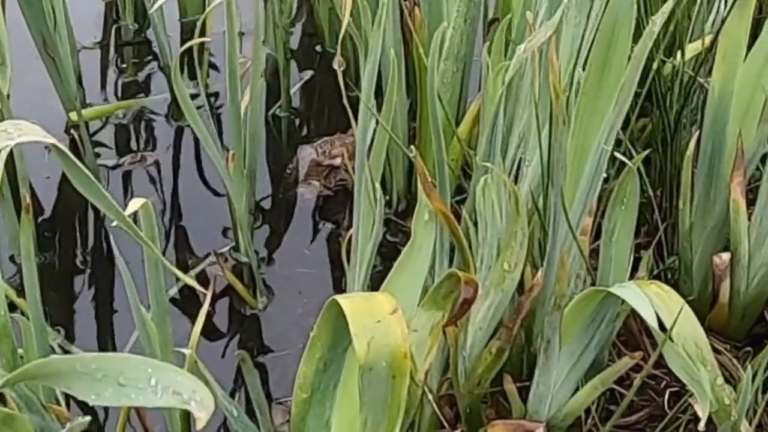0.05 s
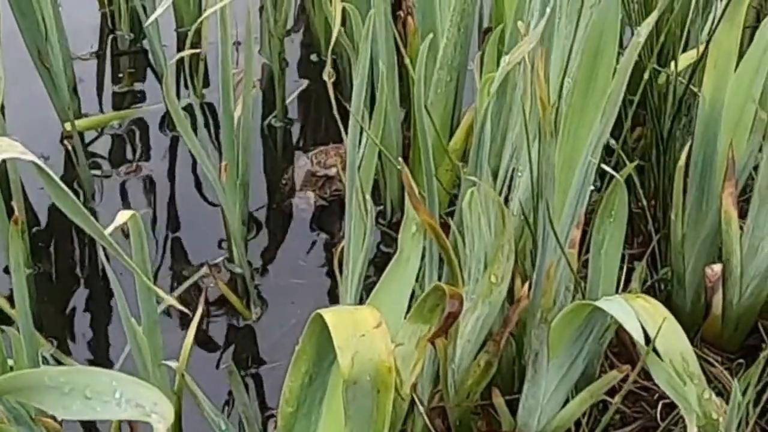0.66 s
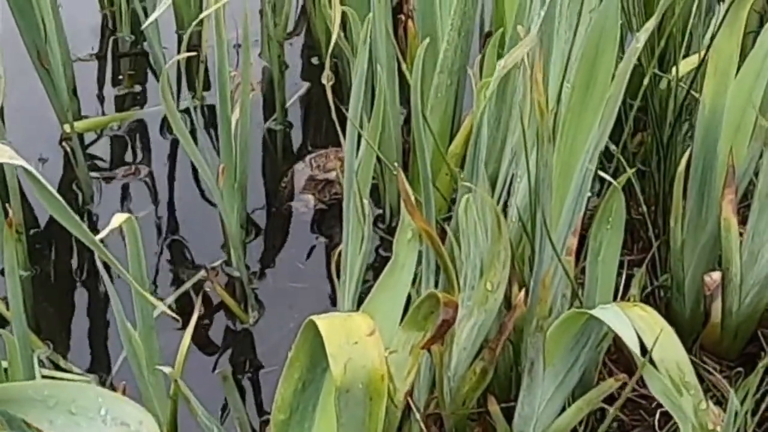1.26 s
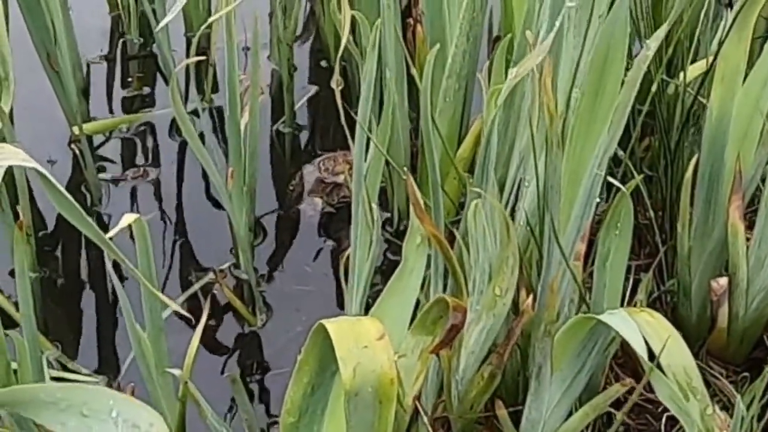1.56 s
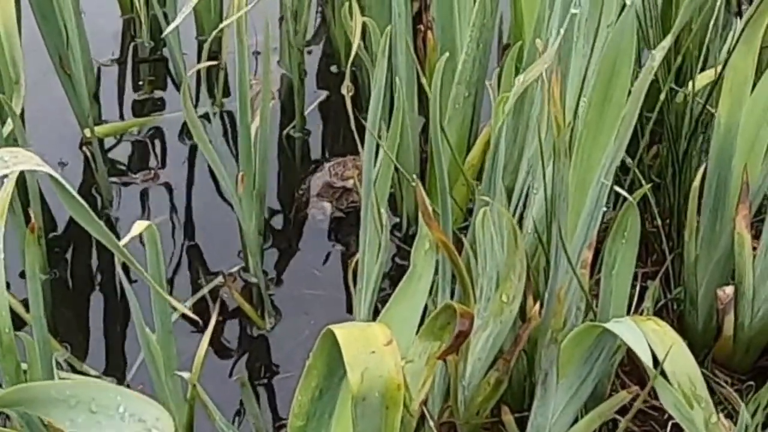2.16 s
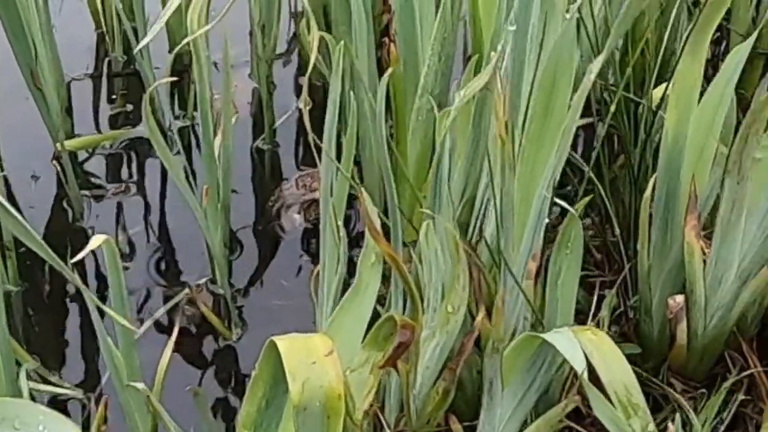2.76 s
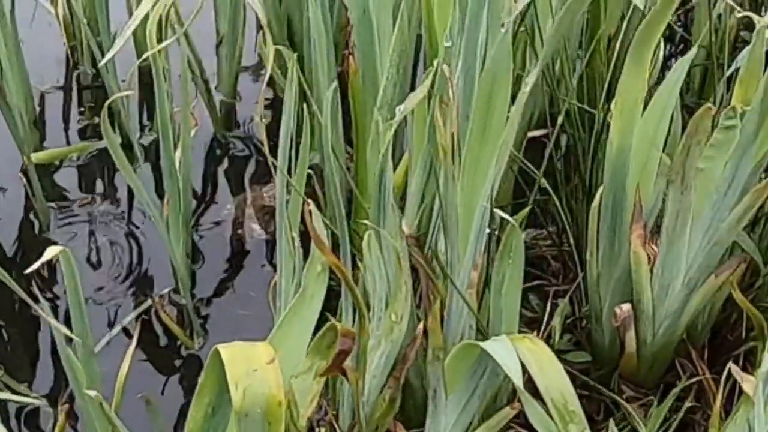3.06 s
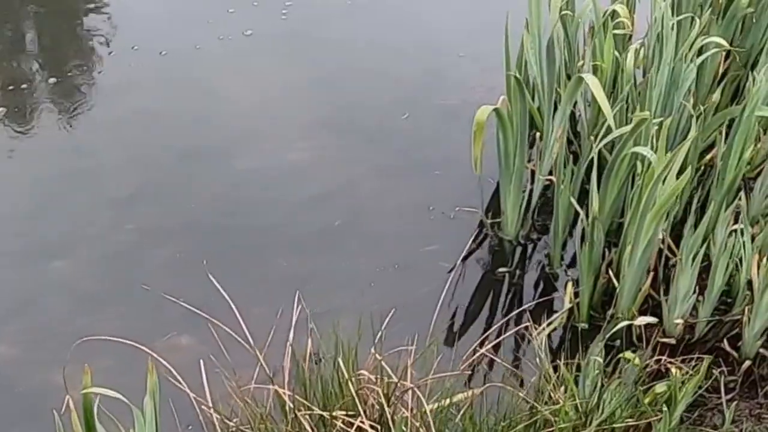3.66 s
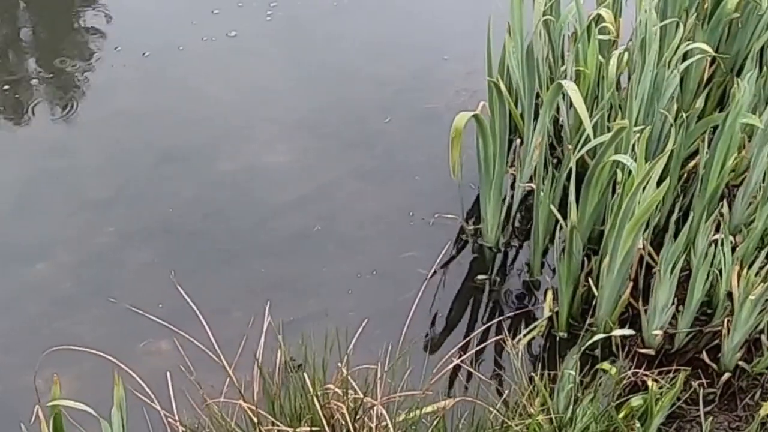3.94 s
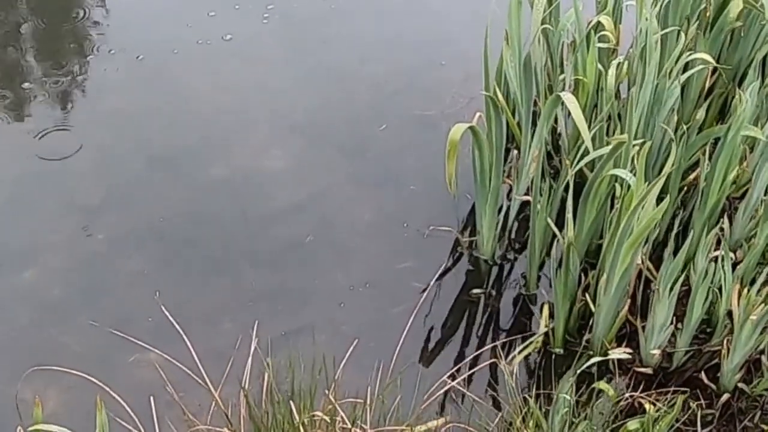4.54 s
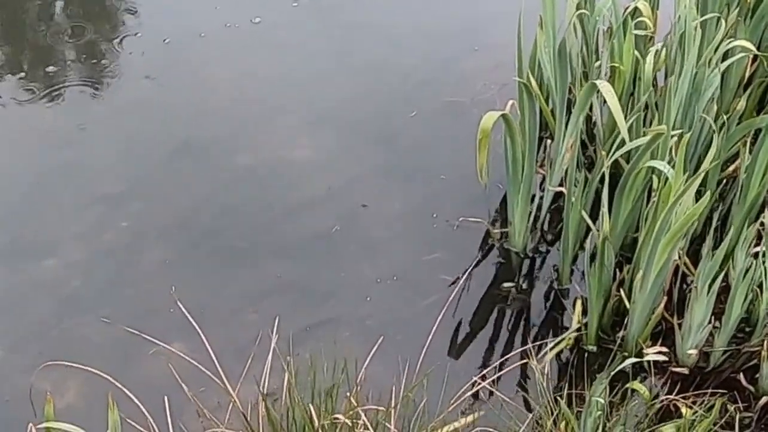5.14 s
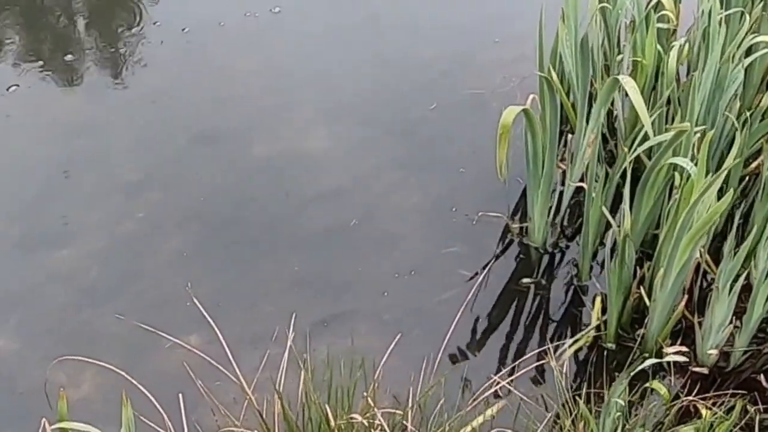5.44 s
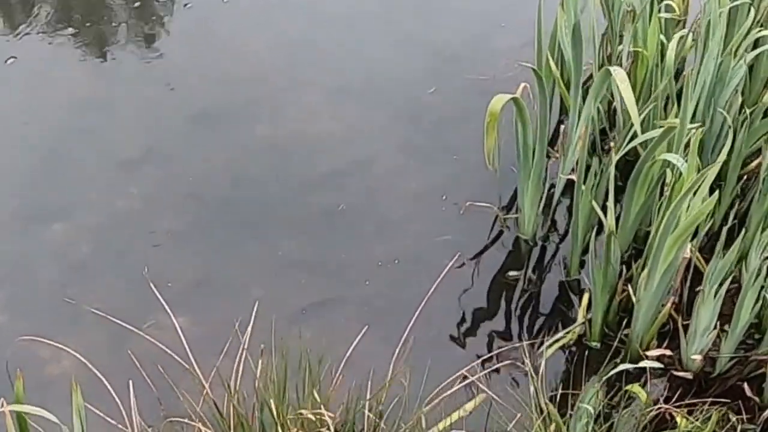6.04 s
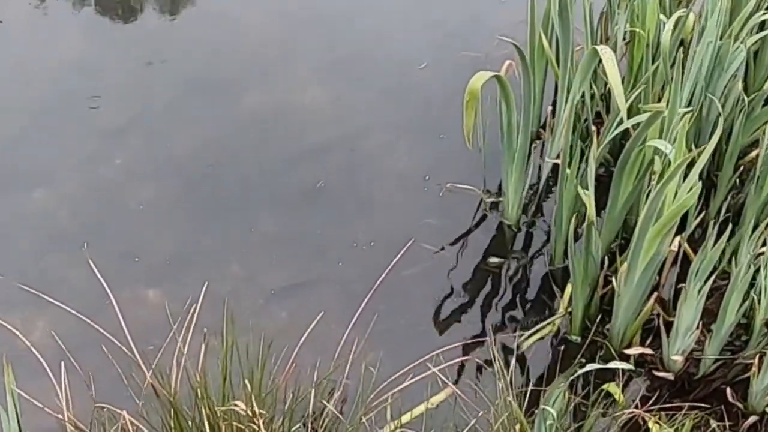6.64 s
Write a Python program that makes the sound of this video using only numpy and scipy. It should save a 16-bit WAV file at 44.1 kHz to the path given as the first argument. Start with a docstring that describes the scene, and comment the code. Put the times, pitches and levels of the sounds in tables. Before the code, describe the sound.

Small birds sing, chirp and twitter around a pond over low wind rumble, with a few raindrops tapping leaves and one sharp click.

```python
"""Small birds whistle around a pond in light drizzle, echoed by the trees, over a soft hush and wind
rumble on the microphone. A lilting song opens; paired chirps and two-voiced mews follow while drops
knock on leaves. At 3.2 s a drop plips into the water, its trapped bubble ringing upward. At 3.5 s
a sharp click sounds and the background falls slightly. From 4.2 s another singer twitters, trills
and ends in a flourish; low, rasping clucks from across the water close the scene."""
import sys
import numpy as np
from scipy import signal
from scipy.fft import rfft, irfft, next_fast_len
from scipy.io import wavfile
from scipy.ndimage import uniform_filter1d, map_coordinates

SR = 44100
rng = np.random.default_rng(int(sys.argv[2]) if len(sys.argv) > 2 else 0)


def int16_out(signal):
    """Quantize to a 16-bit WAV file."""
    q = np.round(np.clip(np.atleast_2d(signal).T, -1, 1) * 32767)
    wavfile.write(sys.argv[1], SR, q.astype(np.int16))


N = 299880

# noise spectra: freq_hz, relative_density_db
RUMBLE_SPECTRUM = [(30, -54), (50, -1), (90, -0.5), (125, -6), (170, -7), (260, -17.5), (600, -44)]
HUSH_SPECTRUM = [(80, -21), (180, -0.5), (270, 1), (400, -1), (600, -3), (850, -5), (1100, -8.5),
                 (1800, -17), (4000, -27.5)]
HISS_SPECTRUM = [(600, -15), (1400, 4), (2000, 2), (3000, 2.5), (4500, 0.5), (7000, -2.5), (10000, -6),
                 (16000, -9)]
WIND_SPECTRUM = [(1, -11.5), (4, 0.5), (10, -2), (19, -8), (30, -16.5), (36, -17.5), (46, -40), (70, -62),
                 (150, -120)]
SPLASH_SPECTRUM = [(300, -9), (1500, -1), (3100, 1.5), (5000, -8), (7800, -17), (9000, -3.5), (10500, -18),
                   (16000, -22)]
RASP_SPECTRUM = [(700, -25), (1200, 1), (1500, -3), (1850, -10.5), (2300, 2), (2900, -13), (4500, -10),
                 (8000, -40)]
# rumble swells: centre_s, half_width_s, rise_db
RUMBLE_SWELLS = [(.25, .1, 5), (2.4, .35, 3.5), (3.17, .22, 7.5), (5.7, .3, 3)]
# far drones: start_s, end_s, pitch_hz, level_db
FAR_DRONES = [(0, 3.5, 162, -56), (0, 3.5, 568, -58), (.9, 2.3, 830, -59.5), (3.6, 4.6, 138, -52.5),
              (4, 4.9, 650, -59), (6.3, 6.9, 650, -61), (6.2, 6.9, 338, -59)]
# wind strength: time_s, relative_db
GUSTS = [(0, -30), (.9, -33), (2.1, -31), (2.4, -27), (3.5, -27), (5.6, -28.5), (6.4, -26), (6.7, -30)]
# tree echo: freq_hz, t60_s
TREE_DECAY = [(500, 0.73), (2500, 2.45), (4300, 1.31), (6000, 0.94), (8000, 0.69)]
# drops on leaves: start_s, level_db, pitch_hz
LEAF_PATS = [(.343, -26, 413), (.420, -28.5, 260), (1.126, -28.5, 288), (1.885, -26, 329.9),
             (2.183, -31.5, 373), (2.622, -23.5, 345), (2.897, -29.5, 405), (2.989, -24, 476),
             (3.168, -24.5, 524), (3.196, -21, 533), (4.997, -27, 280), (5.746, -24, 520)]
# splashes and leaf ticks: start_s, level_db, length_s
SPLASH_BURSTS = [(3.140, -39.5, 0.039), (3.196, -44, .003), (3.645, -45, 0.039), (4.313, -46, .003)]
# syllable contours by shape: time_ms, pitch_hz, level_db
SYLLABLES = { "slide": [(0, 5150, -12), (20.35, 4900, -5.5), (38.05, 4580, 0.5), (51.8, 4320, -1.5),
             (62, 4100, -9.5), (88.8, 3400, -12)], "double": [(0, 4050, 0.5), (10, 4350, -1.5),
             (23, 5050, 1), (32, 6350, -3), (39, 5900, -16), (44, 4300, -6), (54, 4400, 0),
             (72.1, 5300, -1.5), (83, 6250, -6)], "arch": [(0, 4100, -6), (21, 4550, 0), (35, 5600, -.5),
             (45, 6750, -8), (53, 7200, -13), (66, 6400, -6), (80, 5550, 2), (92, 5600, -15)],
             "chip": [(0, 2950, -2.5), (4, 3100, -3), (8, 3700, -6), (13, 4350, 3), (21.05, 4700, -7.5),
             (26.93, 4900, -6.5), (32.33, 5700, -2), (36.8, 4250, -0.5), (40.9, 3750, -5.5),
             (48, 3340, -25)], "lisp": [(0, 5100, -4), (11, 5450, 1), (21, 6200, 1.5), (32, 8300, -4)],
             "mew": [(0, 2600, -19), (24.93, 3200, -0.5), (41.6, 3380, 1.5), (61.1, 3300, 0.5),
             (82.2, 2900, -3), (101, 2400, -2), (119.6, 2230, -7.5), (137, 2470, -12)],
             "seep": [(0, 7400, -8), (14.9, 7650, -5), (39.3, 7850, -8.5), (65, 8600, -14)],
             "tick": [(0, 7400, -18), (12.7, 6100, -4), (19, 7000, -1), (27.5, 8150, 1.5),
             (33.7, 8100, -4)], "down": [(0, 6200, 0), (5, 5800, -5.5), (9.05, 4400, 2.5),
             (14.9, 3800, -11), (22.9, 3150, -7)], "peep": [(0, 5000, -19), (4.02, 4500, -3),
             (7.96, 3800, -23), (11.9, 4800, 2.5), (16.2, 4450, 0), (20.7, 4680, 3.5), (28, 4620, -4),
             (31.7, 4000, -23), (43.5, 10000, -30)], "peak": [(0, 5200, -14), (7, 4750, -3),
             (11, 5000, -12), (15, 6100, 2), (18.9, 6000, -3), (21.5, 7400, -15), (28, 6000, 1.5),
             (35.2, 5150, -8)], "spike": [(0, 4700, -9), (6, 4600, 2), (11, 4000, -9), (19, 6600, 0),
             (23, 6200, -3), (28, 3900, -16), (38.1, 4100, -3.5), (52.4, 3650, -14.5)],
             "hook": [(0, 4050, -2), (5.04, 5100, 0), (9.1, 4500, -1), (12.7, 5050, 1), (16.7, 4200, -1),
             (22, 3850, -6.5), (27, 4200, -10)], "flick": [(0, 4370, -8), (3.94, 4650, 1), (8, 5300, -8.5),
             (12.1, 4400, 1.5), (18.1, 3800, -7), (24.6, 3270, -9)], "hold": [(0, 4570, -7),
             (20.4, 4530, 1.5), (45.7, 4470, 2), (60, 4440, -13)], "rise": [(0, 5200, -8), (35, 5500, 0),
             (60, 6000, 0), (80, 6700, -8)], "pip": [(0, 1596, -11), (4, 1480, -2), (8.8, 1320, -0.5),
             (15, 1200, -9.5), (24.2, 1110, -21)], }
# notes: start_s, shape, level_db, pitch_ratio
FAR_NOTES = [(.16, "slide", -47.5, .9), (.3, "hold", -57, .49), (1.84, "rise", -56, .45),
             (2.36, "hold", -61, .65), (5.97, "slide", -52, .72), (6.07, "hook", -47, .85),
             (6.20, "mew", -57, .82)]
STRAY_NOTES = [(.375, "seep", -55, 1.02), (3.160, "hold", -51.5, 1.71), (3.318, "slide", -47, .96),
               (3.430, "seep", -44, .98), (3.470, "slide", -47, .87), (3.818, "slide", -46.5, 1.08),
               (5.795, "rise", -56.5, 1), (5.995, "rise", -56.5, 1)]
TWITTER_NOTES = [(4.228, "hook", -53, 1.5), (4.290, "hook", -50.5, 1.48), (4.385, "hold", -53.5, 0.98),
                 (4.428, "hook", -47, 1), (4.436, "hook", -45, 1.3), (4.497, "hook", -48, 1.2),
                 (4.516, "hook", -45.5, 0.89), (4.612, "hook", -48, 1.18), (4.672, "hold", -52, 0.96),
                 (4.742, "tick", -40.5, 1), (4.799, "down", -38.5, 0.96), (5.180, "peep", -37, .96),
                 (5.230, "peep", -29, 1), (5.281, "peak", -30.5, 1), (5.343, "spike", -32.5, 1),
                 (5.427, "spike", -33, .96)]
SONG_MOTIF = [(0, "slide", -35.5, 0.99), (.196, "double", -35.5, .99), (.357, "arch", -34.5, 1.01)]  # start_s within the motif
# runs of one note: start_s, end_s, period_s, shape, level_db, pitch_ratio
FAR_TRILLS = [(4.93, 5.82, .198, "slide", -49.5, .75)]
TWITTER_TRILLS = [(4.841, 5.16, .0427, "flick", -41.5, 1.01), (5.577, 5.89, .127, "hook", -35, 1)]
# clucks: start_s, pip_db, pitch_ratio, rasp_db
CLUCK_CALLS = [(5.319, -36.5, .97, -47), (5.654, -31.5, 1.04, -41.5), (5.944, -43.5, 1.08, -42.5),
               (6.226, -42, 1.1, -46), (6.527, -40, 1.1, -50)]
# rasps between clucks: start_s, level_db
LONE_RASPS = [(5.602, -44), (5.755, -44), (5.868, -43.5)]
# calls: start_s, level_db, pitch_ratio
MEW_CALLS = [(.572, -45, .95), (.875, -49, 1.22), (2.025, -42.5, 1), (3.409, -40.5, 1.075)]
CHIRP_PAIRS = [(.761, -38.5, .96), (1.132, -38, 0.97), (1.570, -40, .99), (1.980, -41, 1),
               (2.410, -39.5, .99), (2.896, -40, 1.005), (3.389, -39, 1), (3.898, -38, 1.03),
               (4.903, -41.5, 1.02)]

CLICK_S = 3.511


def amp(db):
    """Decibels to gain."""
    return 10 ** (np.asarray(db) / 20)


def unit_rms(x):
    """Scale to rms 1."""
    return x / np.sqrt(np.mean(x ** 2) + 1e-20)


def log_interp(points, hz):
    """Read (freq_hz, value) points on a log axis."""
    freq_hz, values = np.transpose(points)
    return np.interp(np.log(hz + .01), np.log(freq_hz), values)


def wobble(rate_hz, size=N):
    """Smooth random curve through knots at rate_hz."""
    knots = rng.standard_normal(int(size * rate_hz / SR) + 4)
    grid = np.arange(0, len(knots) - 1, 1 / 4)
    return np.interp(np.arange(size) * rate_hz / SR, grid, map_coordinates(knots, [grid]))


def filtered(x, response):
    """Apply a gain given as a function of frequency."""
    size = next_fast_len(len(x) + SR // 2)
    return irfft(rfft(x, size) * response(np.fft.rfftfreq(size, 1 / SR)), size)[:len(x)]


def noise(spectrum):
    """Coloured noise, rms 1."""
    return unit_rms(filtered(rng.standard_normal(N), lambda hz: amp(log_interp(spectrum, hz))))


def add(track, start_s, sound):
    """Mix a sound in at start_s."""
    part = track[max(0, round(start_s * SR)):][:len(sound)]
    part += sound[:len(part)]


def air(rumble_db, hush_db, hiss_db, drone_gain_db):
    """Distant rumble and hush, both stepping down at the click; faint drones; fine hiss."""
    t = np.arange(N) / SR
    after_click = t > CLICK_S
    swell_db = sum(db * np.exp(-((t - centre_s) / width_s) ** 2)
                   for centre_s, width_s, db in RUMBLE_SWELLS)
    bed = amp(rumble_db + swell_db - 2.8 * after_click + 1.9 * wobble(12)) * noise(RUMBLE_SPECTRUM)
    bed += amp(hush_db - 1.3 * after_click + .74 * wobble(14)) * noise(HUSH_SPECTRUM)
    for start_s, end_s, hz, db in FAR_DRONES:
        size = int((end_s - start_s) * SR)
        tone = np.sin(2 * np.pi * np.cumsum(hz + 8 * wobble(25.01, size)) / SR)
        envelope = amp(db + drone_gain_db + 3.7 * wobble(7.55, size)) * signal.windows.tukey(size, .3)
        add(bed, start_s, envelope * tone)
    return bed + amp(hiss_db) * noise(HISS_SPECTRUM)


def wind(level_db, drive, cutoff_hz):
    """Slow pressure swings on the microphone, softly clipped."""
    gust_db = np.interp(np.arange(N) / SR, *np.transpose(GUSTS))
    swings = np.tanh(drive * noise(WIND_SPECTRUM) * amp((gust_db - np.mean(gust_db)) / 2))
    return amp(level_db) * unit_rms(filtered(swings, lambda hz: 1 / (1 + (hz / cutoff_hz) ** 8)))


def click(step_db, decay_s):
    """A sharp click with a low thump, where the background abruptly changes."""
    t = np.arange(N) / SR - CLICK_S
    return -amp(step_db) * np.sign(t) * np.exp(-np.abs(t) / decay_s) / 2


def tree_echo(x, early_db, tail_db, direct_gain=1):
    """Direct sound, early scatter off stems and bank, and a long tail from the trees."""
    hz, t, spectra = signal.stft(rng.standard_normal(SR), SR, nperseg=256)
    decay = amp(-60 * t / log_interp(TREE_DECAY, hz)[:, None])
    onset = 1 - np.exp(-t / .026)
    _, tail = signal.istft(spectra * decay * onset, SR, nperseg=256)
    lag_s = np.arange(SR // 10) / SR
    early = rng.standard_normal(len(lag_s)) ** 3 * amp(-60 * lag_s / .1) * (lag_s > .002)
    echo = amp(tail_db) * tail / np.linalg.norm(tail)
    add(echo, 0, amp(early_db) * early / np.linalg.norm(early))
    return direct_gain * x + signal.fftconvolve(x, echo)[:N]


def bursts(rows, spectrum, crackle_db):
    """Brief noise puffs with a crackling level."""
    envelope = np.zeros(N)
    for start_s, db, length_s in rows:
        add(envelope, start_s, amp(db) * signal.windows.tukey(int(length_s * SR) + 2, .5))
    return envelope * unit_rms(noise(spectrum) * amp(crackle_db * wobble(400)))


def leaf_pats(t60_s):
    """Each drop gives a leaf a short, heavily damped knock."""
    track, t = np.zeros(N), np.arange(SR // 10) / SR
    attack = 1 - np.exp(-t / .00037)
    for start_s, db, hz in LEAF_PATS:
        modes = np.sin(2 * np.pi * hz * t) + .4 * np.sin(2 * np.pi * hz * 1.62 * t)
        add(track, start_s, amp(db - 60 * t / t60_s) * attack * modes)
    return track


def plip(start_s, level_db, start_hz, rise_hz_per_s, life_s):
    """A trapped bubble rings higher as it nears the surface."""
    track, t = np.zeros(N), np.arange(SR // 20) / SR
    phase = 2 * np.pi * np.cumsum(start_hz + rise_hz_per_s * t) / SR
    add(track, start_s, amp(level_db) * np.exp(-(t / life_s) ** 4) * np.sin(phase))
    return track


def whistle(notes, tremor_depth, upper_db, upper_ratio=2):
    """Gliding syllables with one weaker upper tone, roughened by a fast tremor."""
    track = np.zeros(N)
    for start_s, shape, db, ratio in notes:
        knot_ms, knot_hz, knot_db = np.transpose(SYLLABLES[shape])
        size = int(knot_ms[-1] * SR / 1000)
        t_ms = np.arange(size) * 1000 / SR
        glide_hz = uniform_filter1d(np.interp(t_ms, knot_ms, knot_hz), size=130)
        drift = 1 + tremor_depth * wobble(700, size) + .00784 * wobble(60.3, size)
        phase = 2 * np.pi * np.cumsum(glide_hz * ratio * drift) / SR
        level_db = db + np.interp(t_ms, knot_ms, knot_db) + 1.9 * wobble(262, size)
        envelope = np.sqrt(2) * amp(level_db) * signal.windows.tukey(size, .1)
        add(track, start_s, envelope * (np.sin(phase) + amp(upper_db) * np.sin(upper_ratio * phase)))
    return track


def trill_notes(runs, scatter_db):
    """One syllable repeated at an even pace and uneven level."""
    return [(note_s, shape, db + scatter_db * rng.standard_normal(), ratio)
            for start_s, end_s, period_s, shape, db, ratio in runs
            for note_s in np.arange(start_s, end_s, period_s)]


def far_birds():
    """Stray notes and a slow run, so distant that echo dominates."""
    voice = whistle(FAR_NOTES + trill_notes(FAR_TRILLS, scatter_db=2.5), tremor_depth=.024, upper_db=-35)
    return tree_echo(voice, early_db=-7.5, tail_db=-1, direct_gain=.75)


def clucks(rasp_gap_s=.028, rasp_s=.014):
    """Low falling pips, each opened and closed by a dry rasp; lone rasps between."""
    pips = [(start_s, "pip", db, ratio) for start_s, db, ratio, _ in CLUCK_CALLS]
    rasps = [(start_s + lag_s, db, rasp_s)
             for start_s, _, _, db in CLUCK_CALLS for lag_s in (0, rasp_gap_s)]
    rasps += [(start_s, db, rasp_s) for start_s, db in LONE_RASPS]
    voice = amp(-1.5) * whistle(pips, tremor_depth=.036, upper_db=-18)
    voice += amp(-2.5) * bursts(rasps, RASP_SPECTRUM, crackle_db=2)
    return tree_echo(voice, early_db=-10.5, tail_db=-18)


def mews():
    """Arching calls, one side of the syrinx a little above the other; silent from the click on."""
    notes = [(start_s, "mew", db, ratio) for start_s, db, ratio in MEW_CALLS]
    voice = whistle(notes, tremor_depth=.022, upper_db=-6, upper_ratio=1.17)
    return tree_echo(voice, early_db=-8, tail_db=-15.5) * (np.arange(N) / SR < CLICK_S)


def chirps(gap_s=.093, second_db=-1, lisp_lead_s=.018, lisp_db=-13.5):
    """A near bird chirps in pairs, each chirp led by a rising lisp; others add stray notes."""
    notes = []
    for pair_s, first_db, ratio in CHIRP_PAIRS:
        for start_s, db in [(pair_s, first_db), (pair_s + gap_s, first_db + second_db)]:
            notes += [(start_s - lisp_lead_s, "lisp", db + lisp_db, ratio), (start_s, "chip", db, ratio)]
    voice = whistle(notes + STRAY_NOTES, tremor_depth=.02, upper_db=-22, upper_ratio=1.7)
    return amp(-1.5) * tree_echo(voice, early_db=-8, tail_db=-13)


def twitter():
    """A singer twitters, trills and ends in a flourish."""
    notes = TWITTER_NOTES + trill_notes(TWITTER_TRILLS, scatter_db=.9)
    voice = whistle(notes, tremor_depth=.021, upper_db=-42)
    return amp(-1.06) * tree_echo(voice, early_db=-8.5, tail_db=-7.5)


def lilting_song(note_count=8, first_s=.011, period_s=.498, peak_s=.64, fade_db_per_s2=7, pitch_sag=.01):
    """A motif repeats from the trees, swelling, fading and sinking slightly in pitch."""
    notes = []
    for i in range(note_count):
        turn, place = divmod(i, len(SONG_MOTIF))
        offset_s, shape, db, ratio = SONG_MOTIF[place]
        start_s = first_s + turn * period_s + offset_s
        fade_db = fade_db_per_s2 * (start_s - peak_s) ** 2
        notes.append((start_s, shape, db - fade_db, ratio * (1 - pitch_sag * turn)))
    voice = whistle(notes, tremor_depth=.0095, upper_db=-38)
    return amp(-1.7) * tree_echo(voice, early_db=-7, tail_db=-4.5)


def scene():
    """Mono mix of birds, drops, air, wind and click."""
    drops = leaf_pats(t60_s=.025) + bursts(SPLASH_BURSTS, SPLASH_SPECTRUM, crackle_db=2.5)
    drops += plip(start_s=3.197, level_db=-27.5, start_hz=1820, rise_hz_per_s=42000, life_s=.021)
    mix = lilting_song() + twitter() + far_birds() + chirps() + mews() + clucks()
    mix += tree_echo(drops, early_db=-22, tail_db=-22.5)
    mix += air(rumble_db=-45, hush_db=-46.7, hiss_db=-51.5, drone_gain_db=1.3)
    mix += wind(level_db=-13.6, drive=.45, cutoff_hz=37)
    mix += click(step_db=-9.5, decay_s=.025)
    return mix[None]


def record(dry, cutoff_hz=15850):
    """Brick-wall low-pass."""
    return np.array([filtered(channel, lambda hz: hz < cutoff_hz) for channel in dry])


dry = scene()
out = record(dry)
int16_out(out)
```